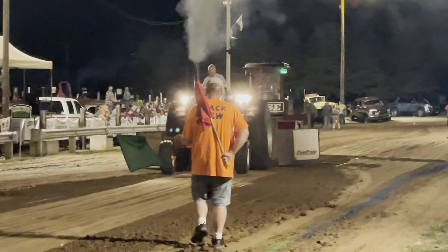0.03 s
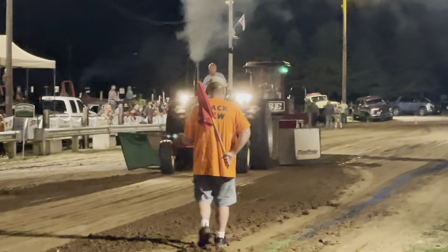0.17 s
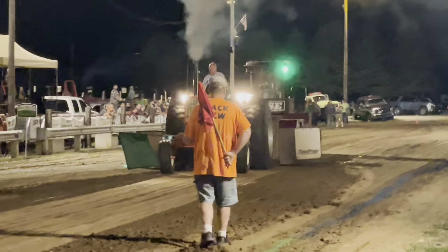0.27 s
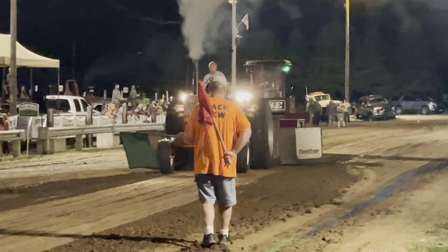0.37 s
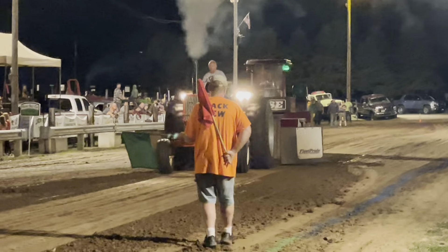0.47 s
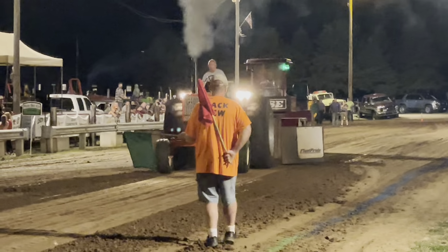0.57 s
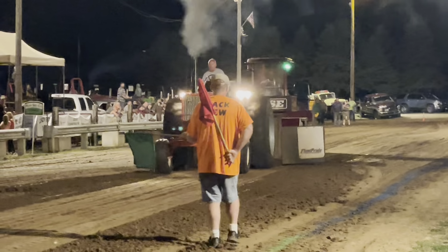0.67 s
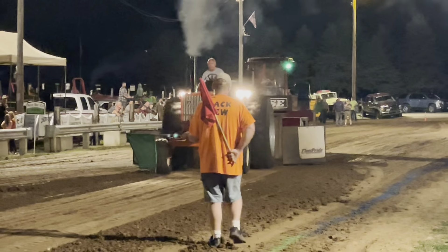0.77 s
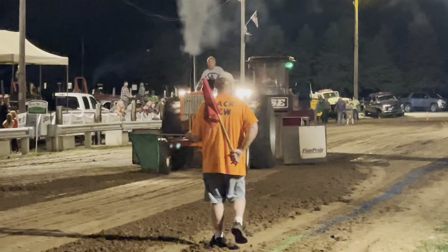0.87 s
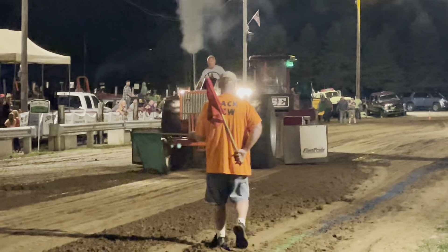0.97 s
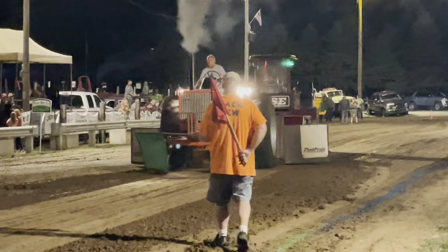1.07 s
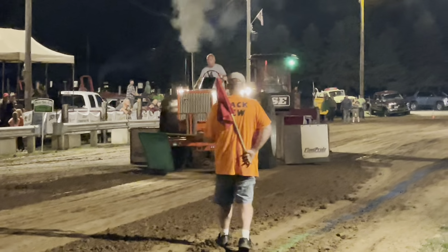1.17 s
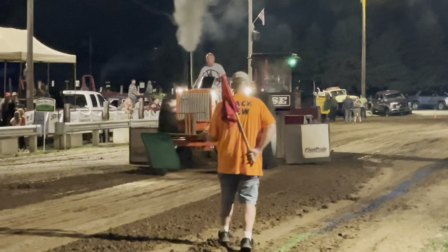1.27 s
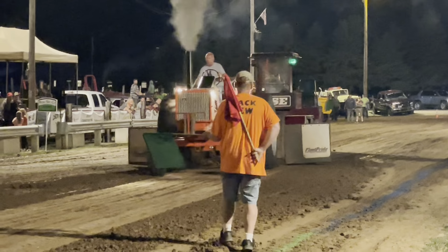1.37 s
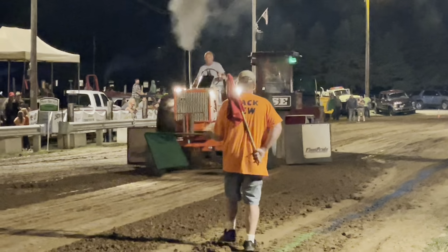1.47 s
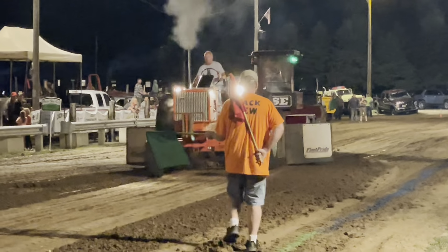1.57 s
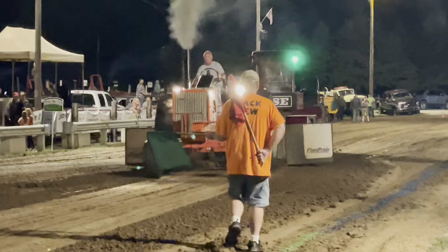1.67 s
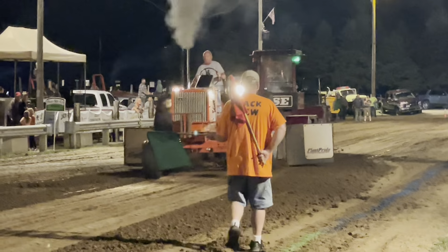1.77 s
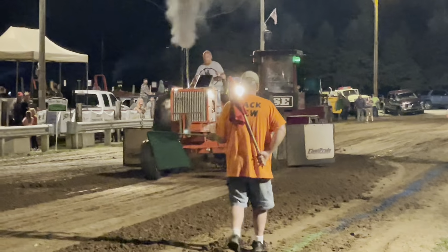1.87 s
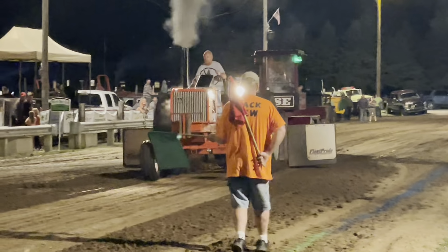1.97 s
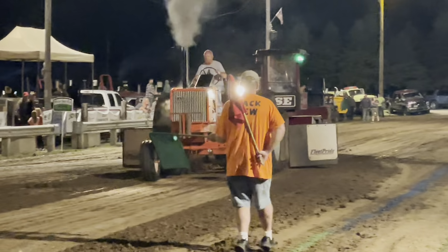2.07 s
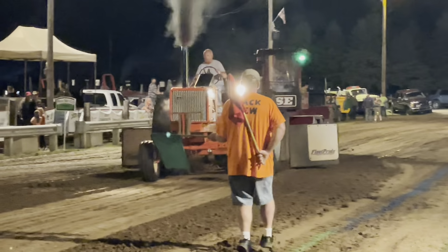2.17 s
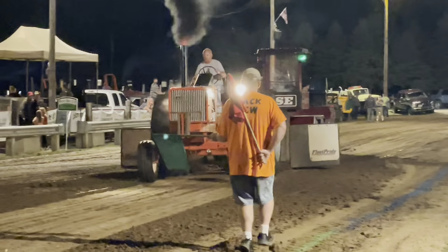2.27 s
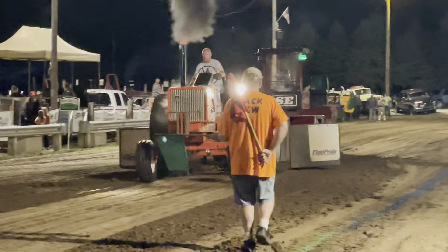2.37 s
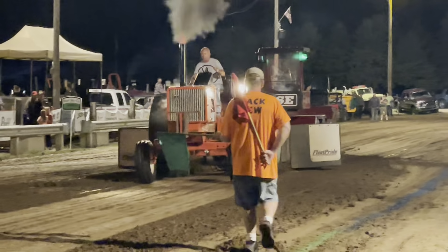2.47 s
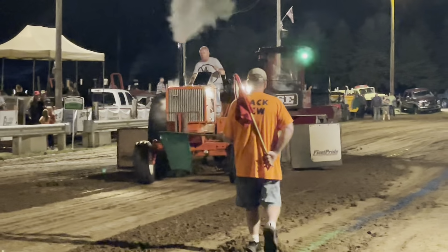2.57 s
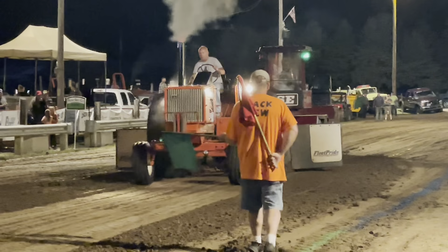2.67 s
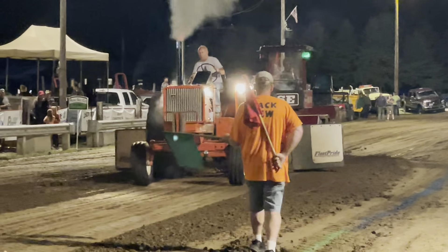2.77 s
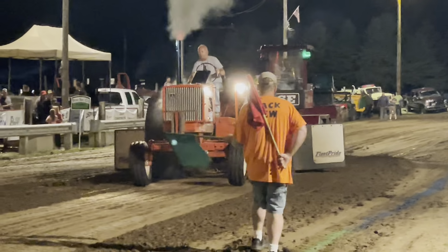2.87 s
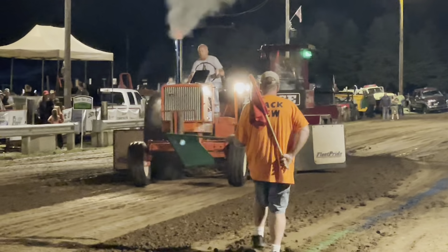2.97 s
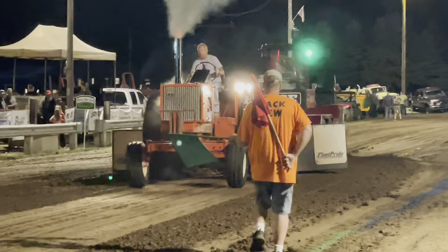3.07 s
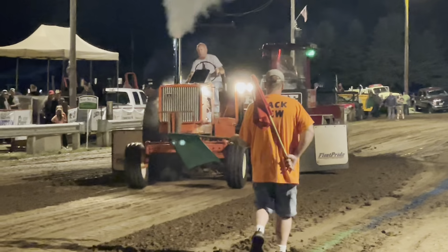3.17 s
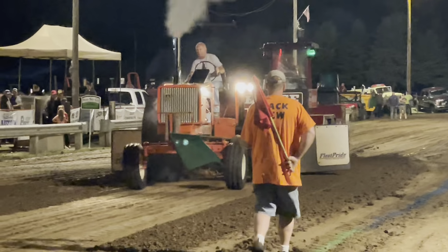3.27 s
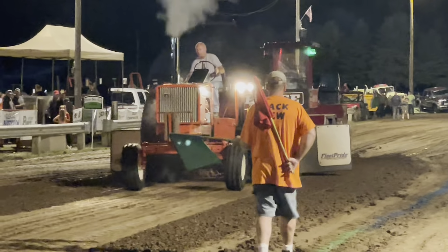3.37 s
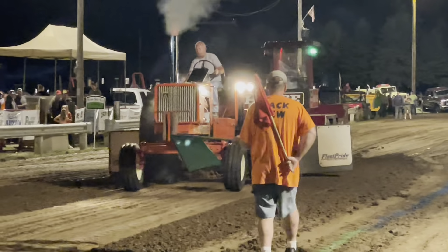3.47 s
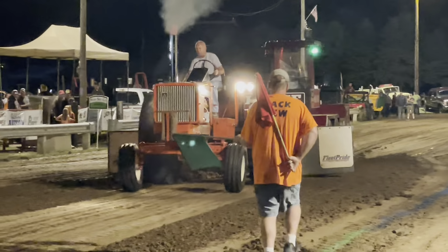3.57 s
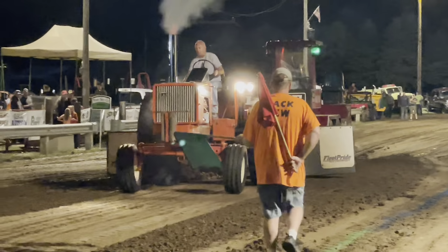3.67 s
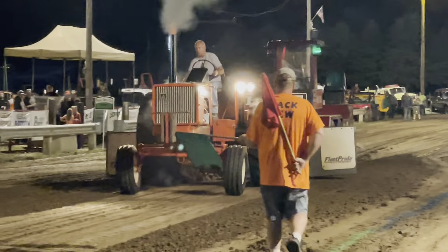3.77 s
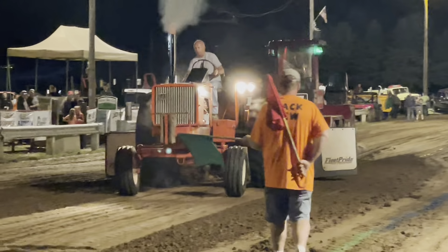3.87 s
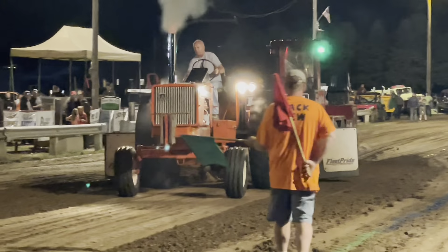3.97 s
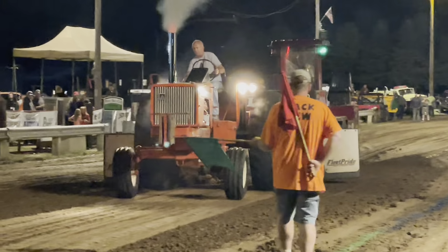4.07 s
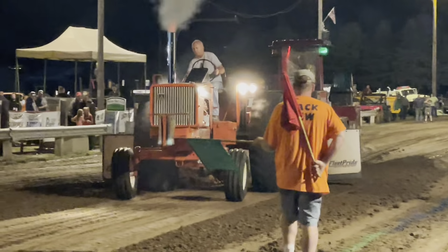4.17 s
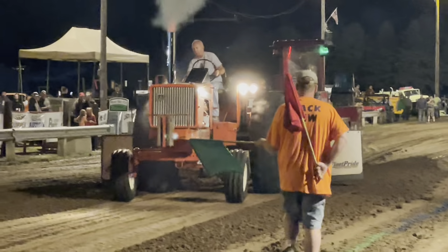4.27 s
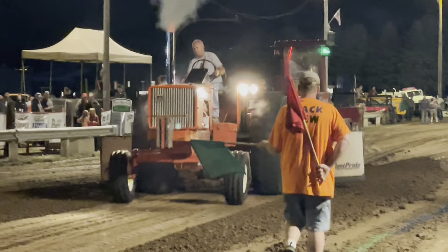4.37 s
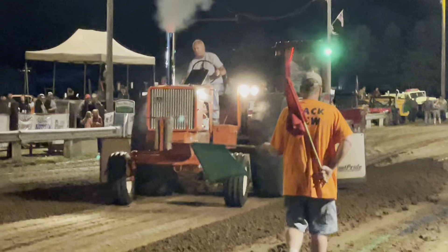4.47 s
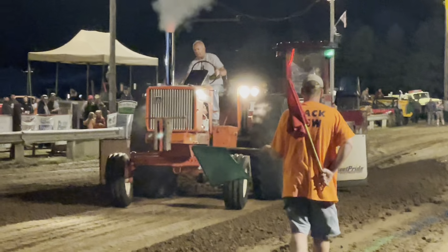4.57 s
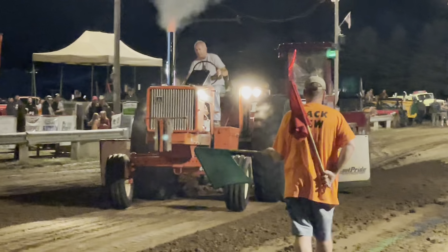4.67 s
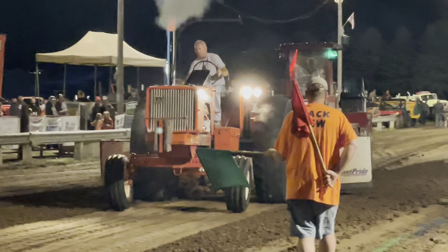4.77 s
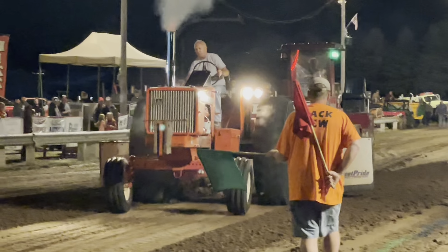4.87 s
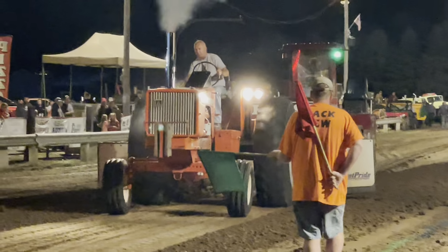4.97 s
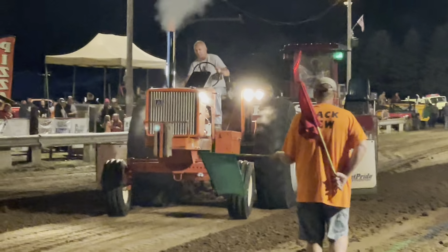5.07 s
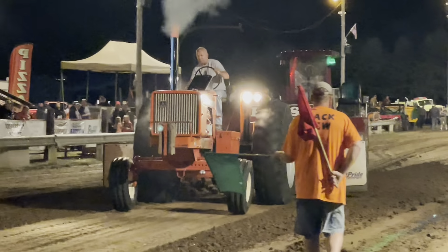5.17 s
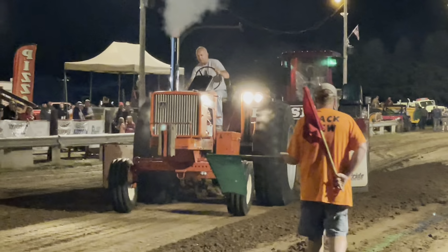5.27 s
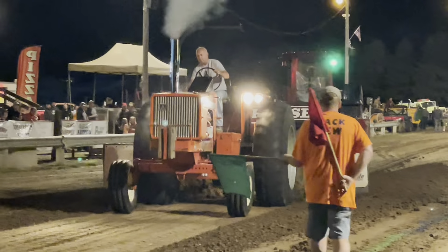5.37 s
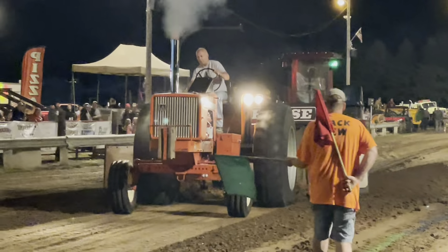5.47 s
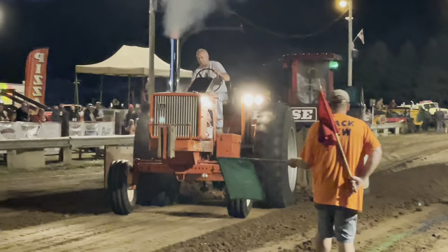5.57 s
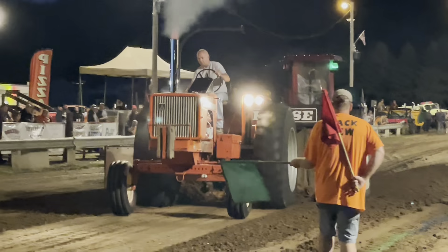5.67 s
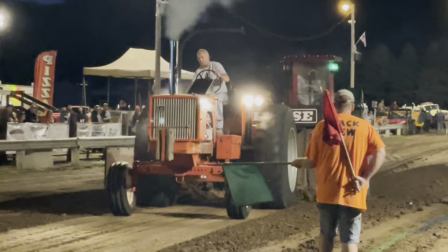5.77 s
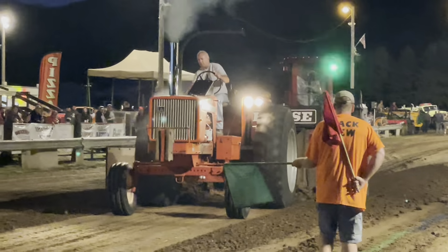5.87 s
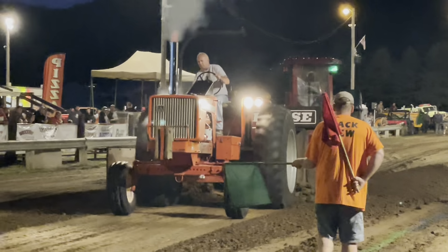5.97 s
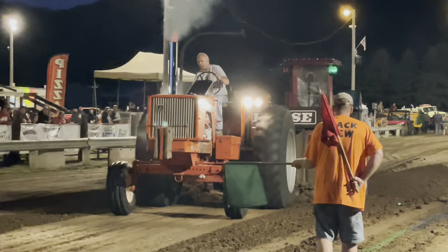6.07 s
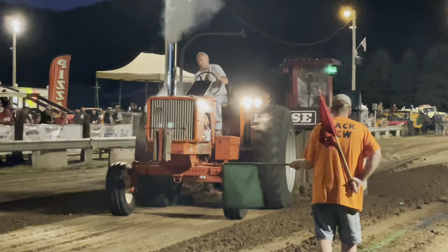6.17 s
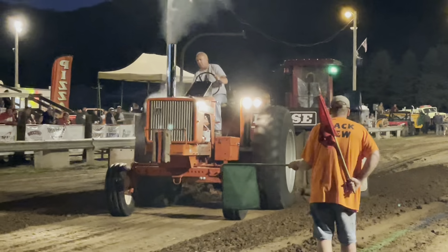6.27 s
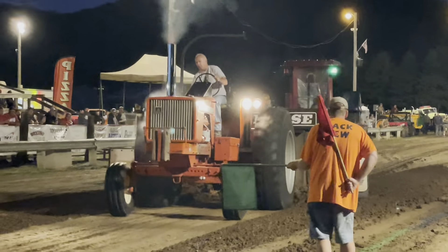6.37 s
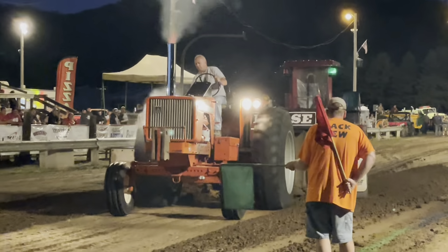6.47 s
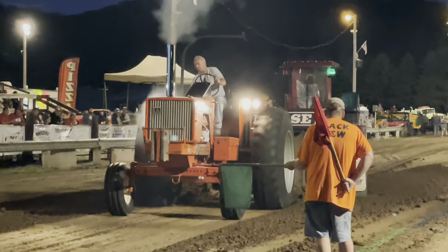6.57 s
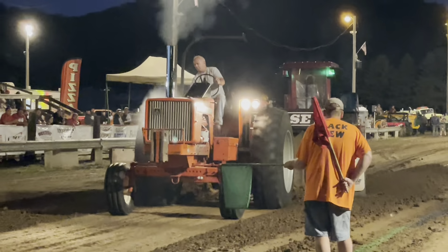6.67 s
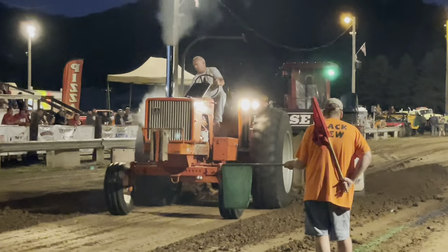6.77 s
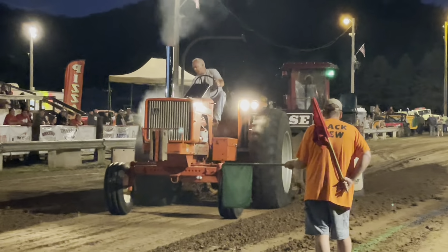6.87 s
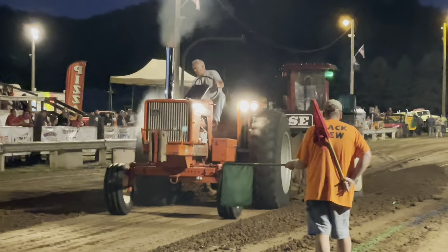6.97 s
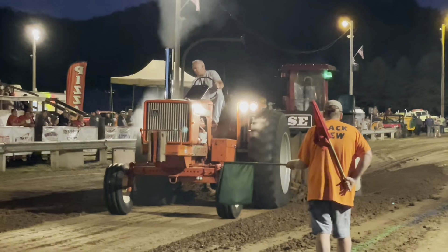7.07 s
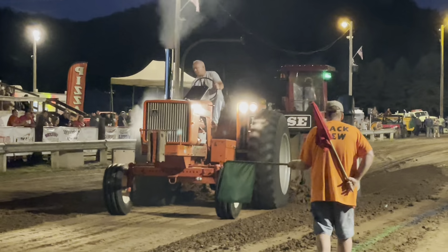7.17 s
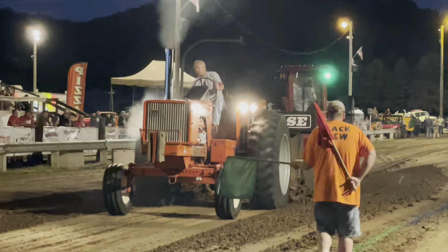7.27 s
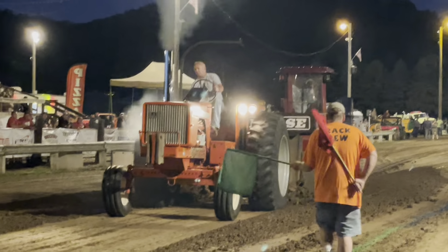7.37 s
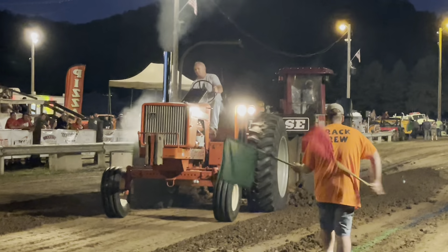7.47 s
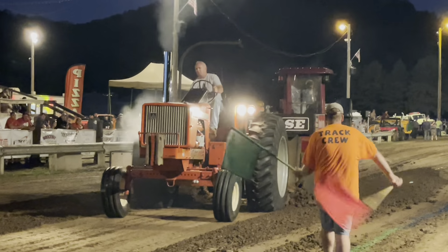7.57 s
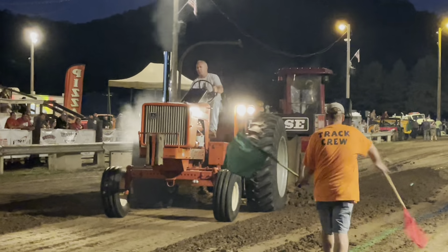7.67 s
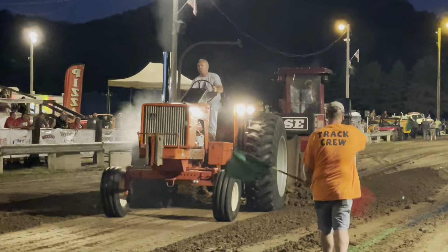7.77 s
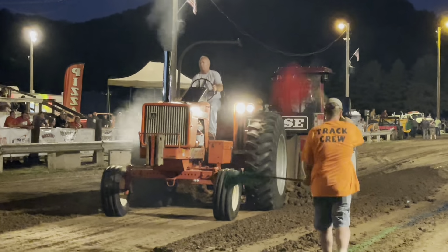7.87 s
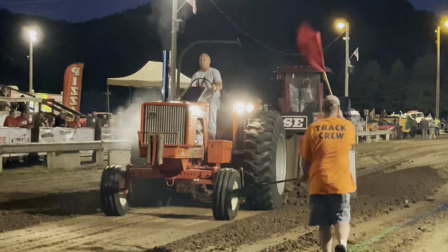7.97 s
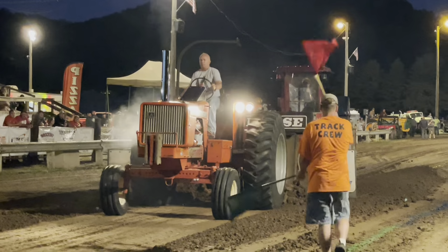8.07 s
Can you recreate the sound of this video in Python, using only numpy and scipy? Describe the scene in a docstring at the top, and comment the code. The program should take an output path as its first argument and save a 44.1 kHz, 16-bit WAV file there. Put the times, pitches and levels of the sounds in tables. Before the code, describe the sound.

Deep droning, rasping tractor engine with a thin turbo whistle strains closer outdoors, revs up and holds steady, then abruptly drops off at the end.

```python
"""Open dirt track: a six-cylinder turbo diesel tractor drags a sled towards the microphone.
Each firing booms from the stack, nearly a pure tone, and pulses noise into chuffs, roar and rasp.
A delayed ground echo sweeps the roar as the tractor nears; left and right differ, with a short diffuse tail.
The turbo note climbs and the firing rate rises; near the end the throttle shuts and both run down.
"""
import sys
import numpy as np
from scipy import signal
from scipy.fft import rfft, irfft, next_fast_len
from scipy.io import wavfile
from scipy.ndimage import map_coordinates

SR = 44100
rng = np.random.default_rng(int(sys.argv[2]) if len(sys.argv) > 2 else 0)


def wav_out(sig):
    """Save sig, one row per channel (or a flat mono array), as 16-bit PCM at SR to the path in sys.argv[1]."""
    wavfile.write(sys.argv[1], SR, np.round(np.clip(np.atleast_2d(sig).T, -1, 1) * 32767).astype(np.int16))


N = 358527
T = np.arange(N) / SR

# Puff strength per cylinder. Each row, in firing order: roar in dB, rasp in dB, intake in dB.
CYLINDER_PUFFS = [(-9, -7.5, -3.5), (-2, -5, -10), (-8, -5.5, -4.5), (1, -4.6, -3), (-0.5, -3, -2.5),
                  (-2, -7.5, -5)]

# Stages of the pull: the engine breaks free of lugging, the driver eases off, then shuts the throttle.
FREE_S, FREE_TAKES_S = 2.21, 0.12
EASE_S, EASE_TAKES_S = 7.5, 0.09
SHUT_S, SHUT_TAKES_S = 7.795, 0.04


def amp(db):
    """Decibels to gain."""
    return np.exp(np.asarray(db) * (np.log(10) / 20))


def unit(x):
    """Scales to rms 1."""
    return x / np.sqrt(np.mean(x ** 2) + 1e-20)


def follow(rows):
    """Columns of a time curve, interpolated sample by sample."""
    s, *columns = np.transpose(rows)
    return [np.interp(T, s, column) for column in columns]


def across(points, hz):
    """Reads a spectrum on a log-frequency axis."""
    f, value = np.transpose(points)
    return np.interp(np.log(hz + 1), np.log(f + 1), value)


def filtered(x, response):
    """Filters by a function of frequency."""
    size = next_fast_len(N + 4096, real=True)
    f = np.fft.rfftfreq(size, 1 / SR)
    return irfft(rfft(x, size) * response(f), size)[:N]


def wander(rate_hz, step=8):
    """Smooth noise of rms 1, rolled off above the given rate; drawn every few samples."""
    size = next_fast_len(N // step + 2, real=True)
    f = np.fft.rfftfreq(size, step / SR)
    slow = irfft(rfft(rng.standard_normal(size)) / (1 + (f / rate_hz) ** 4), size)
    return unit(np.interp(T, np.arange(size) * step / SR, slow))


def rush(centre_hz, level_db, spread_hz):
    """Noise band with a moving centre and level."""
    angle = 2 * np.pi * np.cumsum(centre_hz * np.ones(N)) / SR
    band = wander(spread_hz) * np.cos(angle) + wander(spread_hz) * np.sin(angle)
    return amp(level_db) * unit(band)


def ramp(start_s, takes_s):
    """Goes from 0 to 1 over the given time."""
    return np.clip((T - start_s) / takes_s, 0, 1)


def since(start_s):
    """Seconds gone by since a moment, 0 before it."""
    return np.maximum(T - start_s, 0)


def hauled():
    """Share of the haul done between breaking free and shutting the throttle, 0-1."""
    return ramp(FREE_S, SHUT_S - FREE_S)


def throttle(eased_db, shut_db, coast_db_per_s):
    """Change of a layer's level in dB as the throttle eases, shuts and the engine coasts."""
    eased = eased_db * ramp(EASE_S, EASE_TAKES_S)
    shut = shut_db * ramp(SHUT_S, SHUT_TAKES_S)
    return eased + shut + coast_db_per_s * since(SHUT_S)


def distance():
    """Metres to the tractor: a steady pace, then the sled drags it to a halt."""
    start_m, pace_m_per_s, bogs_s, halt_takes_s = 36.07, 2.585, 5.7, 1.3
    pace = pace_m_per_s * (1 - ramp(bogs_s, halt_takes_s))
    return start_m - np.cumsum(pace) / SR


def diffuse_tail(x, t60_s=0.066):
    """Short diffuse tail, different left and right, strongest in the treble; turns as the tractor moves."""
    # Tail against the direct sound. Each row: frequency in Hz, level in dB.
    tail_spectrum = [(200, -24), (500, -14), (1100, -15), (1900, -22), (3000, -12), (8000, -11),
                     (12000, -6), (13500, -16)]
    turns_per_m = 1.2
    tail_s = T[:SR]
    tail = rng.standard_normal((2, SR)) * amp(-60 * tail_s / t60_s) * (tail_s > 0.005)
    tail /= np.linalg.norm(tail, axis=1, keepdims=True)
    source = filtered(x, lambda f: amp(across(tail_spectrum, f)))
    a, b = signal.fftconvolve(source[None], tail, axes=1)[:, :N]
    turned = (a + 1j * b) * np.exp(2j * np.pi * turns_per_m * distance())
    return np.array([turned.real, turned.imag])


def tone_colours(x, spread_m=3.4):
    """Slow tone-colour changes: peaks and hollows in the gas noise that grow or fade with distance."""
    # Each row: frequency in Hz, width in Hz, level change in dB, centre of its distance curve in m.
    colour_bands = [(232, 66, 3.5, 19), (310, 65, -2, 23), (350, 50, 1.5, 33), (381, 28, -3, 21),
                    (420, 55, -4.5, 28), (480, 68, -9, 37), (700, 100, 2, 32), (760, 96, 2, 16.6),
                    (1040, 100, -3.5, 20), (1157, 88, 6.5, 18.4), (1230, 86, 2, 32), (1280, 57, 3.5, 22.4),
                    (1330, 170, -3.5, 30.2), (1650, 140, -7, 33.5), (1970, 250, 3.5, 32.6),
                    (2000, 150, -1.5, 18), (2290, 130, 3.5, 21), (2700, 450, 2.5, 37),
                    (3920, 250, 2.5, 17.4), (4900, 930, -2.5, 24), (5400, 270, -0.5, 16.3)]
    size = next_fast_len(N + 4096, real=True)
    spectrum, f = rfft(x, size), np.fft.rfftfreq(size, 1 / SR)
    metres, out = distance(), x
    for hz, width_hz, db, at_m in colour_bands:
        near = np.exp(-((metres - at_m) / spread_m) ** 2)
        band = irfft(spectrum / (1 + (2 * (f - hz) / width_hz) ** 2), size)[:N]
        out = out + (amp(db) - 1) * near * band
    return out


def ground(x):
    """The dirt returns a duller copy, later and later as the tall stack comes closer."""
    # Strength of the dirt's echo. Each row: distance in m, strength 0-1.
    bounce_curve = [(19.5, 0.41), (25.5, 0.51), (30, .42), (36, 0.3)]
    stack_m, microphone_m, sound_m_per_s = 3, 1.5, 343  # heights and speed of sound
    metres = distance()
    delay_s = 2 * stack_m * microphone_m / (metres * sound_m_per_s)
    bounce = np.interp(metres, *np.transpose(bounce_curve))
    echo = filtered(x, lambda f: 1 / (1 + (f / 8500) ** 3))
    late = map_coordinates(echo, [(T - delay_s) * SR], order=3)
    return (x + bounce * late) / np.sqrt(1 + bounce ** 2)


def thud():
    """A short swell of deep rumble at 2.2 s."""
    at_s, spread_s = 2.22, 0.05
    return np.exp(-((T - at_s) / spread_s) ** 2) * rush(32, -42, spread_hz=14)


def shaking():
    """Gain of the low chuffing, strongest before the turbo has spooled up."""
    level_db, unspooled_db, spool_s = -31.5, 6.5, 3
    unspooled = 1 - ramp(0, spool_s)
    closing_db = throttle(eased_db=-1.0, shut_db=-1.5, coast_db_per_s=-35)
    return amp(level_db + unspooled_db * unspooled + closing_db)


def hum(waver_rad=0.63, free_db=-5):
    """Shaken bodywork: low fixed notes follow the engine's shaking and settle once it runs free."""
    # Each row: note in Hz, level in dB above the chuffing gain while the engine lugs.
    hum_notes = [(53.8, -9), (80, -5.5)]
    notes = sum(amp(db) * np.sin(2 * np.pi * hz * T + waver_rad * wander(8.2)) for hz, db in hum_notes)
    return np.sqrt(2) * shaking() * amp(free_db * ramp(FREE_S, FREE_TAKES_S)) * notes


def overrun(firings, flutter_db=2.0, fade_db_per_s=-6):
    """Starved of fuel, the cylinders puff unevenly: a few wavering lines fall with the crank."""
    # Lines of the coasting engine. Each row: multiple of the cycle rate, level in dB.
    overrun_orders = [(5, -37), (8, -49), (11, -48), (12, -45.5), (25, -40.5)]
    out = np.zeros(N)
    for order, db in overrun_orders:
        angle = 2 * np.pi * (round(order) * firings / len(CYLINDER_PUFFS) + rng.random())
        out += amp(db + flutter_db * wander(22)) * np.cos(angle)
    return np.sqrt(2) * ramp(SHUT_S, SHUT_TAKES_S) * amp(fade_db_per_s * since(SHUT_S)) * out


def turbo(firings, jitter_hz=70, ripple_hz=55, flutter_db=4.0, shut_db=-6):
    """Compressor blade note, shaken by the exhaust pulses; drag slows it once the throttle shuts."""
    # Turbo speed under load. Each row: time in seconds, blade note in Hz.
    blade_note = [(0, 12830), (.4, 12980), (.92, 13010), (1.3, 13820), (1.72, 14130), (2.2, 14960),
                  (2.6, 16200), (5.3, 15900), (5.9, 15620), (7.45, 15650), (7.8, 14950)]
    # Whistle loudness by pitch. Each row: pitch in Hz, level in dB.
    whistle = [(10000, -36), (12800, -37), (12990, -30), (13750, -39), (15000, -43), (15700, -47),
               (16100, -51)]
    halves_s = 0.77
    pitch_hz = follow(blade_note)[0] / (1 + since(SHUT_S) / halves_s)
    level_db = across(whistle, pitch_hz) + shut_db * ramp(SHUT_S, SHUT_TAKES_S)
    pitch_hz = pitch_hz + jitter_hz * wander(190) + ripple_hz * np.cos(2 * np.pi * firings)
    note = np.sin(2 * np.pi * np.cumsum(pitch_hz) / SR)
    return amp(level_db) * unit(note * amp(flutter_db * wander(99)))


def strokes(firings, cylinder_db, lead, sharpness, steady, scatter_db):
    """Gas flow swells at each stroke; stroke sizes vary by cylinder and by clipped chance."""
    turn = firings + lead + 0.5
    stroke = np.floor(turn).astype(int)
    chance = np.clip(rng.standard_normal(4096), -2, 1)
    uneven_db = scatter_db * np.take(chance, stroke, mode="wrap")
    size = amp(np.take(cylinder_db, stroke, mode="wrap") + uneven_db)
    return steady + size * abs(np.sin(np.pi * turn)) ** sharpness


def spill():
    """Spare boost: a narrow hiss from easing off until the throttle shuts."""
    spilling = ramp(EASE_S, EASE_TAKES_S) * (1 - ramp(SHUT_S, SHUT_TAKES_S))
    return spilling * rush(3830, -36.5, spread_hz=150)


def intake(firings):
    """Air rushes into the compressor in uneven gulps, one per firing; gliding hiss bands pulse with it."""
    # Gliding bands of brighter hiss that swell and fade during the pull. Each row: start in seconds,
    # rise in seconds, centre in Hz, glide in Hz per second, level in dB,
    # level slope after the rise in dB per second.
    hiss_bands = [(1.2, 0.82, 4806, -170, -28.5, -7.5), (1.85, 0.39, 4230, -5.5, -28, -60),
                  (2.05, 0.22, 5870, -330, -28, -14), (4.95, 0.55, 5690, -150, -34.5, 0.5)]
    centre_hz, shut_hz, base_db, free_db = 3679, -700, -26, -15.5
    intake_db = np.transpose(CYLINDER_PUFFS)[2]
    gulps = unit(strokes(firings, intake_db, lead=0.0, sharpness=4.0, steady=0.27, scatter_db=3.5))
    level_db = base_db + free_db * ramp(FREE_S, FREE_TAKES_S)
    level_db = level_db + throttle(eased_db=4.0, shut_db=0, coast_db_per_s=-15)
    air = rush(centre_hz + shut_hz * ramp(SHUT_S, SHUT_TAKES_S), level_db, spread_hz=430)
    closing_db = throttle(eased_db=-10, shut_db=-4, coast_db_per_s=-28)
    for s, rise_s, hz, glide_hz_per_s, db, slope_db_per_s in hiss_bands:
        hiss_hz = hz + glide_hz_per_s * since(s)
        hiss_db = db + slope_db_per_s * since(s + rise_s) + closing_db
        air += ramp(s, rise_s) * rush(hiss_hz, hiss_db, spread_hz=250)
    return gulps * (air + spill())


def pipe(f):
    """Gain of the exhaust pipe's resonances and the hollows between them."""
    # Both tables, each row: frequency in Hz, width in Hz, level in dB.
    resonances = [(238.8, 2.9, 5), (486, 11, 6.5), (566, 66, 6.5), (726, 89, 7), (1240, 90, 5.5),
                  (1850, 160, 1.5), (2320, 160, -2), (3150, 170, 0.5), (4320, 300, 2), (5530, 1570, 5.5),
                  (7020, 220, 5), (7880, 620, 9)]
    hollows = [(880, 70, -3), (1020, 100, -5.5), (1640, 120, -3), (1990, 130, -4), (2820, 330, -4),
               (3560, 120, -2), (4900, 200, -2), (5900, 300, -3)]
    return amp(sum(db / (1 + (2 * (f - hz) / width_hz) ** 2) for hz, width_hz, db in resonances + hollows))


def drone(firings, speed):
    """Unequal cylinders add wavering lines at multiples of the cycle rate; the pipe swells those it meets."""
    # Four-stroke lines. Each row: multiple of the cycle rate, dB while lugging, dB at full speed.
    engine_orders = [(3, -28, -44), (4, -24, -25), (5, -57, -26), (8, -20, -23.5), (9, -19.5, -17),
                     (10, -25, -30), (11, -31, -33), (12, -19, -20), (13, -27, -30), (14, -25, -35),
                     (15, -28.5, -30), (16, -36, -32), (18, -25.5, -35), (19, -26, -37), (21, -33, -31.5),
                     (22, -31, -42), (24, -25.5, -33.5), (25, -27.5, -33.5), (28, -34, -43), (29, -37, -28),
                     (33, -33, -26), (38, -29.5, -36)]
    base_db, fade_db, muffled_db = -14, -9, -2.5
    muffle_s, muffle_takes_s = 1.1, 0.27  # the turbine, up to speed, muffles the lugging engine
    unevenness = 0.16
    free = np.clip((speed - 128) / 10, 0, 1)
    out = np.zeros(N)
    for order, lugging_db, full_db in engine_orders:
        drift = wander(15.3)
        angle = 2 * np.pi * (round(order) * firings / len(CYLINDER_PUFFS) + rng.random()) + unevenness * drift
        line_gain = amp(lugging_db + free * (full_db - lugging_db))
        out += line_gain * np.cos(angle) * (1 + unevenness * drift[::-1])
    level_db = base_db + fade_db * hauled() + throttle(eased_db=0.0, shut_db=-2, coast_db_per_s=-17)
    muffled = ramp(muffle_s, muffle_takes_s) - ramp(FREE_S, FREE_TAKES_S)
    return filtered(np.sqrt(2) * amp(level_db + muffled_db * muffled) * out, pipe)


def howl():
    """Hollow exhaust band that opens up as the engine runs free and sinks in pitch as the tractor nears."""
    # Each row: time in seconds, centre in Hz.
    howl_centre = [(2.1, 1244), (2.45, 1065), (4.6, 1089), (5.15, 1045), (5.5, 732.5), (7.8, 694)]
    level_db = -41.5 + 8 * ramp(FREE_S, FREE_TAKES_S)
    closing_db = throttle(eased_db=-3.0, shut_db=-23, coast_db_per_s=-3)
    return rush(follow(howl_centre)[0], level_db + closing_db, spread_hz=137)


def coughs():
    """Brief throaty noise bursts from the stack of the lugging engine."""
    # Each row: time in seconds, level in dB.
    cough_times = [(0.041, -16.5), (.31, -24)]
    spread_s = 0.023
    swell = sum(amp(db) * np.exp(-((T - s) / spread_s) ** 2) for s, db in cough_times)
    return swell * rush(562, 0, spread_hz=34)


def stack(x, spectrum):
    """Colours gas noise by a spectrum and the pipe, at rms 1."""
    return unit(filtered(x, lambda f: amp(across(spectrum, f)) * pipe(f)))


def exhaust(firings):
    """Gas leaving the stack: low chuffs, a ragged howling roar and a sharply pulsed, crackling rasp."""
    # Spectra ahead of the pipe. Each row: frequency in Hz, dB per Hz.
    chuff_spectrum = [(25, -30), (38, -22), (52, -3), (65, -9), (82, -5), (100, -7), (140, 4), (175, 0),
                      (240, -2.5), (300, 1), (450, -6.5), (700, -2.5), (1000, -16), (1500, -63)]
    roar_spectrum = [(200, -34), (380, -0.5), (500, 1.5), (750, -1), (950, 3), (1200, -1), (1550, -1),
                     (1900, 0), (2400, -3.5), (3000, -6), (4500, -12), (9000, -45)]
    rasp_spectrum = [(700, -22), (1800, -3.5), (3000, 4), (4500, 1.5), (5500, -0.5), (6500, 1.5),
                     (8000, -5), (10000, 0.5), (11500, -5), (12400, -2.5), (13600, -6.5), (15000, -22),
                     (16000, -34)]
    # Gas flow under load. Each row: time in seconds, rasp level in dB.
    flow = [(0, -28.5), (.85, -27.5), (1.15, -23.5), (1.5, -26), (1.7, -26), (2.22, -21.5), (2.28, -25.5),
            (2.45, -21), (3, -23.5), (3.8, -21.5), (4.1, -23), (5.25, -23.5), (5.5, -25), (7.5, -25)]
    crackle_db = 1.1
    gust_db, swell_db = 0.75, 0.3  # moving air flutters the treble and swells roar and rasp
    roar_db = -23.5 - 2.87 * hauled() + throttle(eased_db=-2.5, shut_db=-3.5, coast_db_per_s=-9)
    rasp_db = follow(flow)[0] + throttle(eased_db=-3.5, shut_db=-6.0, coast_db_per_s=-26)
    roar_cylinders, rasp_cylinders, _ = np.transpose(CYLINDER_PUFFS)
    chuff_noise, roar_noise, rasp_noise = rng.standard_normal((3, N))

    puffs = strokes(firings, roar_cylinders, lead=0, sharpness=4.1, steady=0.67, scatter_db=11.5)
    chuff = stack(chuff_noise * puffs, chuff_spectrum)

    surge = unit(strokes(firings, roar_cylinders, lead=0.23, sharpness=2.9, steady=5.0, scatter_db=8.0))
    roar = stack(roar_noise * surge, roar_spectrum) * amp(roar_db)
    roar = roar + surge * (howl() + coughs())

    pulses = strokes(firings, rasp_cylinders, lead=0.23, sharpness=4.6, steady=1.0, scatter_db=7.0)
    rasp = stack(rasp_noise * pulses * amp(crackle_db * wander(1200)), rasp_spectrum)
    rasp = rasp * amp(rasp_db + gust_db * wander(24))
    return chuff * shaking() + (roar + rasp) * amp(swell_db * wander(11))


def boom(firings, flutter_db=0.83, crank_wobble_rad=0.1):
    """Firing note, almost a pure tone; the crank speeds up and slows once a cycle."""
    # Each row: time in seconds, boom of the stack in dB before flutter and overrun.
    boom_level = [(0.0, -14), (0.35, -12), (1.0, -16), (1.17, -11), (2.23, -12.5), (2.32, -16.5),
                  (2.36, -13.5), (2.66, -19.5), (3.31, -19.5), (3.7, -15.5), (4.33, -17), (4.68, -22),
                  (5.2, -17), (5.65, -18), (5.92, -23.5), (6.04, -19), (6.28, -19.5), (6.41, -18),
                  (7.63, -21), (7.78, -20.5)]
    drop_db, drop_s, return_db_per_s = -18, 0.1, 51  # collapses with the fuel, creeps back on the overrun
    angle = 2 * np.pi * firings
    angle = angle + crank_wobble_rad * np.sin(2 * np.pi * firings / len(CYLINDER_PUFFS))
    overrun_db = drop_db * ramp(SHUT_S, drop_s) + return_db_per_s * since(SHUT_S + drop_s)
    level_db = follow(boom_level)[0] + overrun_db + flutter_db * wander(48)
    return np.sqrt(2) * amp(level_db) * np.cos(angle)


def crank_speed():
    """Firings per second: climbs under load, then sags steadily with the throttle shut."""
    # Each row: time in seconds, firings per second under load.
    load_speed = [(0.0, 118.2), (0.75, 119), (0.95, 120.7), (1.13, 122), (1.65, 123.8), (1.9, 127.5),
                  (2.22, 128.5), (2.32, 137), (2.41, 139), (6.97, 139), (7.72, 139.3), (7.8, 146)]
    sag_hz_per_s = 48
    return follow(load_speed)[0] - sag_hz_per_s * since(SHUT_S)


def left_right(x):
    """Left and right differ in phase and level by frequency, which widens the sound."""
    # Each row: frequency in Hz, radians by which left leads.
    phase_lead = [(30, 0), (130, -.33), (600, -.35), (840, -.5), (920, 1.2), (1080, 0), (1300, -.2),
                  (2200, 0), (3200, .55), (5300, .55), (5800, -1.5), (6700, -.8), (7700, -2.3),
                  (8150, -2.2), (8400, -3), (8950, -3.2), (13100, -6.28)]
    # Each row: frequency in Hz, left minus right in dB.
    balance = [(250, 0), (470, .8), (680, -5.3), (810, -3), (880, -7.5), (1050, 1.2), (1330, -2.3),
               (1700, 0)]

    def channel(f, side):
        """Response of the left (+1) or right (-1) channel."""
        tilt = amp(across(balance, f))
        gain = np.sqrt(2 / (1 + tilt ** (-2 * side)))
        return gain * np.exp(0.5j * side * across(phase_lead, f))

    return np.array([filtered(x, lambda f: channel(f, side)) for side in (1, -1)])


def scene():
    """One crankshaft times the firing sources; gas noise also takes ground echo, tone colours and tail."""
    speed = crank_speed()
    firings = np.cumsum(speed) / SR
    gas = tone_colours(ground(exhaust(firings) + intake(firings)))
    tones = boom(firings) + drone(firings, speed) + overrun(firings) + turbo(firings) + hum()
    return left_right(gas + tones + thud()) + diffuse_tail(gas)


def record(dry):
    """The recorder's band limit: a linear-phase low-pass."""
    edge_hz = 15800
    low_pass = signal.firwin(511, edge_hz, window=("kaiser", 9), fs=SR)
    return signal.oaconvolve(dry, low_pass[None], "same")


dry = scene()
out = record(dry)
wav_out(out)
```